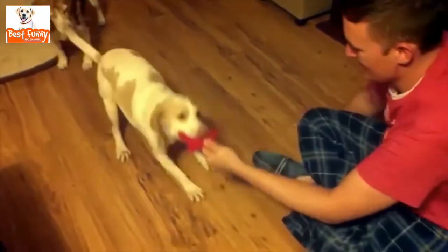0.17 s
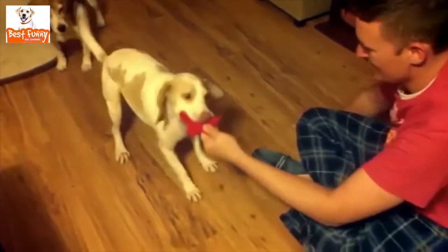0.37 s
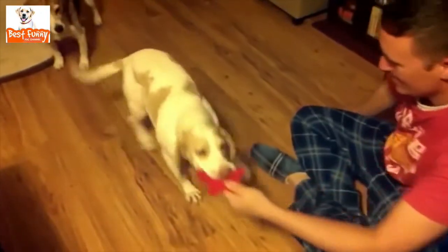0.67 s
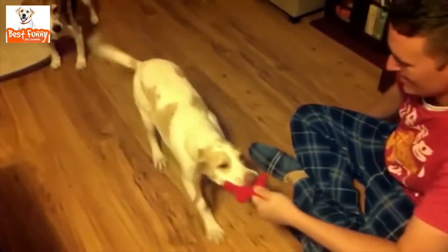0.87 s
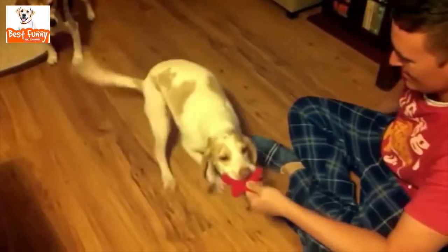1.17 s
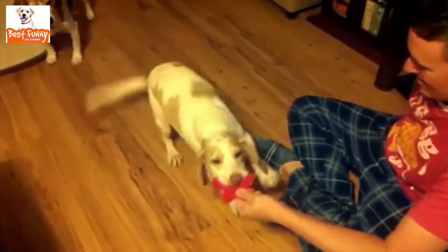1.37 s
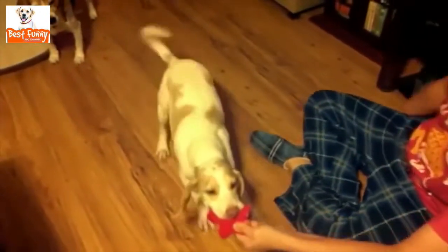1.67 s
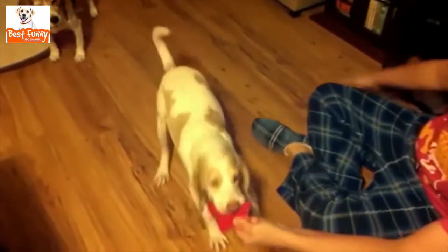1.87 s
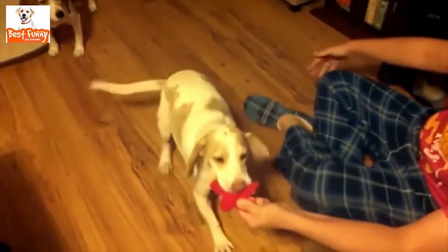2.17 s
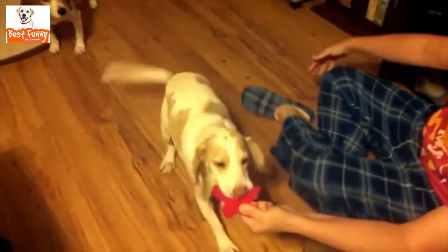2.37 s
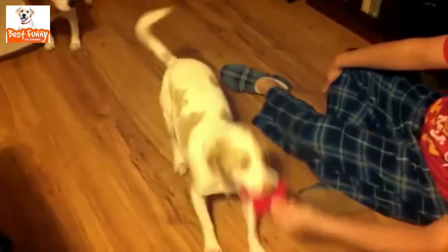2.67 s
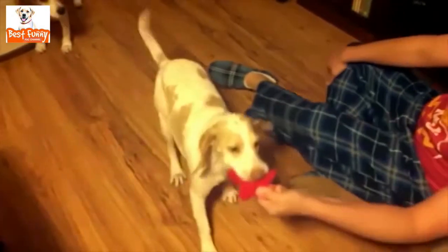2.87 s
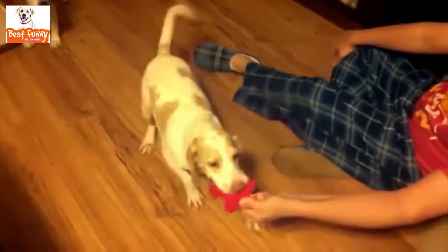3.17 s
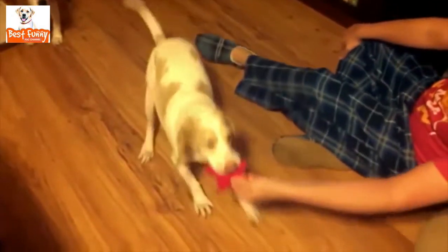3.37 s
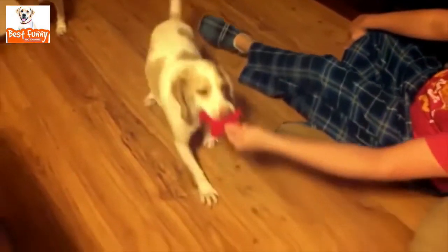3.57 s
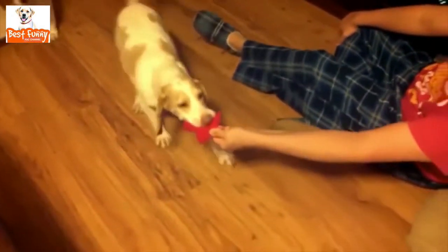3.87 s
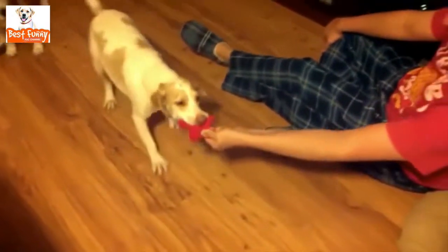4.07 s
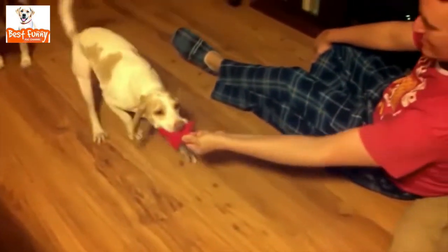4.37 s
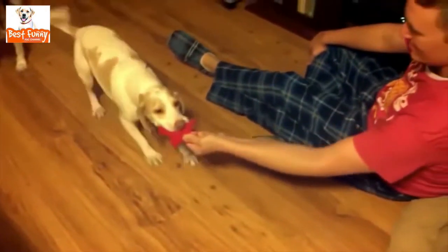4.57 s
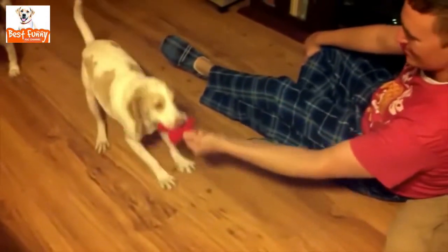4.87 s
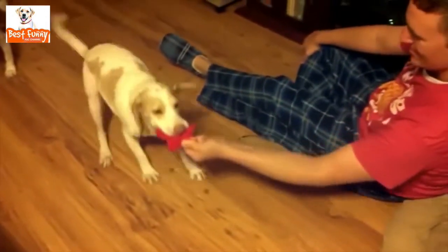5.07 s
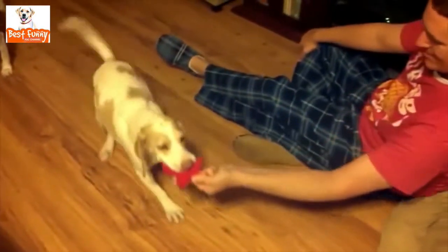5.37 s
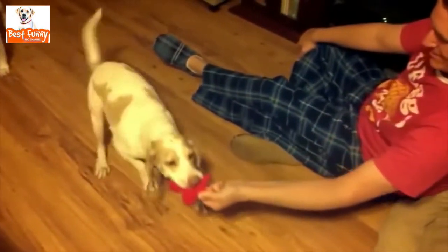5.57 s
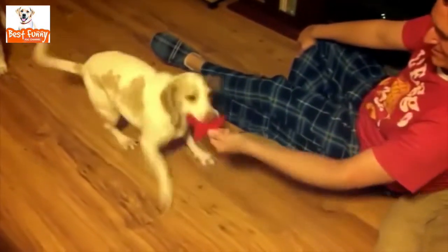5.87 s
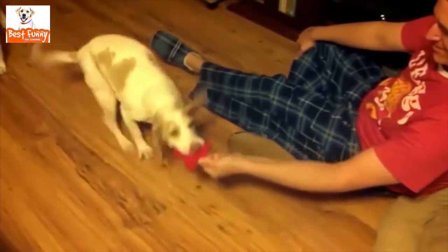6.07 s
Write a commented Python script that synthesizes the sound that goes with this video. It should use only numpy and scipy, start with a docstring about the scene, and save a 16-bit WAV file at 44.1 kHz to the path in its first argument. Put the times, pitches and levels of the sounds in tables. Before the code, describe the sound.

In a bare, slightly echoing living room, a dog's claws click and scrabble on wooden planks as it braces and pulls at a toy. The sharpest taps come early, then steps and brief skids follow more closely, with occasional soft pad thumps. Light fur and cloth rustle sits over a low hush. The microphone lacks the highest treble and has a few momentary dropouts.

```python
"""A bare, lively living room with a hardwood floor: a dog plays tug with a cloth toy.
Its claws tap and skid in stick-slip clicks that ring plank and claw and echo off the walls.
Its pads thud softly on the joists; fur and cloth rustle over the room's hush.
The microphone passes nothing above 7 kHz, and the sound cuts out briefly a few times."""
import sys
import numpy as np
from scipy import signal
from scipy.fft import rfft, irfft
from scipy.io import wavfile

SR = 44100
rng = np.random.default_rng(int(sys.argv[2]) if len(sys.argv) > 2 else 0)


def pcm_store(signal):
    """Save signal as 16-bit PCM."""
    levels = np.round(np.clip(np.atleast_2d(signal), -1, 1) * 32767)
    wavfile.write(sys.argv[1], SR, levels.astype(np.int16).T)


N = 274136
TIME = np.arange(N) / SR

# paw landings: (time [s], level [dB], plank pitch [Hz], board knock [dB], mid clack [dB],
# room send [dB], drag level [dB])
STEPS = [(0.1589, -29.5, 830, 5, 2, -13, -77), (0.7885, -22.5, 1012, 0.5, 2.5, 2.5, -41),
         (1.295, -43.5, 910, 20.5, -5, 0.5, -64.5), (1.308, -37.5, 893, -1.5, -0.5, -4.5, -59),
         (1.493, -40.5, 1120, -1, -6, 2, -72), (1.5201, -21.5, 1123, 0.5, 2, 1.5, -43.5),
         (2.2215, -37.5, 1017, 9, -7, -3.5, -60.5), (2.4506, -27, 913, -1.5, 1, 4, -44.5),
         (2.872, -40, 1193, 1.5, 5.5, 8.5, -48.5), (3.0995, -28.5, 1025, 4.5, 0.5, 2, -44),
         (3.287, -43.5, 1040, -12, 12, 0, -70), (3.5623, -29.5, 1040, 0, 3, 3, -51.5),
         (3.762, -37.5, 970, 5.5, 4.5, 6.5, -47.5), (4.053, -35.5, 990, -3, 3, 5.5, -49),
         (4.358, -30, 1000, 2.5, 1, -11, -49.5), (4.6149, -26.5, 1065, -3.5, -5.5, 0.5, -52),
         (4.7338, -32.5, 1057, 0, 1.5, 5, -45.5), (5.0707, -32, 1010, 3.5, 3, 0, -57),
         (5.2549, -26, 1160, -1.5, -3.5, 2.5, -46.5), (5.3305, -33, 1130, 4.5, 7, 2, -53.5),
         (5.5562, -36.5, 995, -6, -3.5, 1.5, -64), (5.825, -31, 1110, 3, -6.5, 2, -52.5),
         (6.046, -33.5, 1064, 3.5, 4, 3.5, -56.5), (6.208, -35, 1080, 6, 3, -8, -54)]


def from_db(db):
    """Decibels to gain."""
    return 10 ** (np.asarray(db) / 20)


def unit_rms(x):
    """Scale to rms 1."""
    return x / np.sqrt(np.mean(x ** 2) + 1e-20)


def at_hz(points, hz):
    """Read a table on a log-frequency axis."""
    known_hz, values = np.transpose(points)
    return np.interp(np.log(hz + 1e-6), np.log(known_hz), values)


def add(track, time_s, sound):
    """Mix a sound into a track."""
    start = min(max(round(time_s * SR), 0), N)
    track[start:start + len(sound)] += sound[:N - start]


def coloured(noise, spectrum):
    """Shape a noise by a spectrum; rms 1."""
    gain = from_db(at_hz(spectrum, np.fft.rfftfreq(N, 1 / SR)))
    return unit_rms(irfft(rfft(noise) * gain, N))


def resonate(force, modes, extra_db):
    """Parallel resonances of alternating sign, driven by one force."""
    out = 0
    for k, (hz, width_hz, db) in enumerate(modes):
        r = np.exp(-np.pi * width_hz / SR)
        feedback = [1, -2 * r * np.cos(2 * np.pi * hz / SR), r * r]
        ringing = signal.lfilter([1 - r * r, 0, r * r - 1], feedback, force)
        out = out + (-1) ** k * from_db(db + extra_db[k]) * ringing
    return out


def with_level(sound, db, length_s):
    """Scale to the energy of a level held for length_s."""
    return sound * from_db(db) * np.sqrt(length_s * SR / (np.sum(sound ** 2) + 1e-20))


def clicks(size, per_s, spread_db):
    """Impulses of random time, strength and sign."""
    chance, strength, sign = rng.random((3, size))
    return (chance < per_s / SR) * from_db(spread_db * strength) * np.sign(sign - .5)


def hush():
    """Steady low noise of the room."""
    # (frequency [Hz], relative density [dB])
    spectrum = [(25, -40.5), (55, -36.5), (85, -20), (130, -8.5), (240, -0.5), (300, -2), (400, -7),
                (650, -8), (1000, -9.5), (1500, -13.5), (2800, -18), (6500, -29), (9000, -48.5)]
    return from_db(-59) * coloured(rng.standard_normal(N), spectrum)


def rustle():
    """Fur, toy and trousers rub: fine, dense grains with small random swells."""
    # (time [s], level [dB])
    envelope = [(0, -60), (.55, -67.5), (.7, -50.5), (1.1, -50.5), (1.45, -56.5), (2.2, -55.5), (3.1, -53),
                (4.0, -57.5), (4.25, -49.5), (5.0, -52), (5.2, -48.5), (5.65, -47), (6.22, -47)]
    # (frequency [Hz], relative density [dB])
    spectrum = [(200, -28), (500, -26.5), (750, -3.5), (1050, -1), (2300, -7.5), (4000, -1.5), (6500, 1.5),
                (9000, -7)]
    level_db = np.interp(TIME, *np.transpose(envelope))
    knots_s = np.linspace(0, TIME[-1], 200)
    swell_db = 2.7 * np.interp(TIME, knots_s, rng.standard_normal(len(knots_s)))
    return from_db(level_db + swell_db) * coloured(clicks(N, per_s=5000, spread_db=9), spectrum)


def pads():
    """Soft, low thuds of pads on the joists; some are duller, some reach higher."""
    # (time [s], level [dB], contact [s], top [Hz])
    thuds = [(2.222, -52.5, 0.023, 700), (2.694, -61, 0.1, 300), (2.755, -58, 0.039, 300),
             (2.832, -48.5, 0.0061, 300), (3.1, -52, .015, 714), (4.35, -54, 0.077, 700)]
    # (frequency [Hz], width [Hz], gain [dB])
    joist_modes = [(122, 56, 4), (238, 89, 6.5), (490, 370, 4.5)]
    out, t = np.zeros(N), TIME[:SR // 5]
    for time_s, db, length_s, top_hz in thuds:
        softness = signal.butter(2, [top_hz / 4, top_hz], "band", fs=SR, output="sos")
        force = signal.sosfilt(softness, rng.standard_normal(len(t)) * np.exp(-(t / length_s) ** 2))
        thud = resonate(force, joist_modes, np.zeros(len(joist_modes)))
        add(out, time_s, with_level(thud, db, length_s))
    return out


def room(x, onset_s=0.0014, early_db=0.5, early_decay_s=0.022):
    """Reflections from floor and furniture melt into a diffuse tail that dies band by band."""
    # (frequency [Hz], T60 [s])
    decay_times = [(200, 0.88), (1000, 0.52), (2500, 0.8), (6500, 0.37)]
    t, hz = TIME[:SR], np.fft.rfftfreq(SR, 1 / SR)
    white, centres_hz = rfft(rng.standard_normal(SR)), np.geomspace(125, 8000, 7)
    tail = 0
    for centre_hz, share in zip(centres_hz, np.eye(len(centres_hz))):
        band = irfft(white * np.interp(hz, centres_hz, share), SR)
        tail = tail + band * np.exp(-np.log(1000) * t / at_hz(decay_times, centre_hz))
    reflections = unit_rms(clicks(SR, per_s=580, spread_db=9.5))
    early = from_db(early_db) * reflections * np.exp(-t / early_decay_s)
    response = (tail + early) * np.clip(t / onset_s - 1, 0, 1)
    return signal.fftconvolve(x, response / np.sqrt(np.sum(response ** 2)))[:N]


def wall_echoes(count):
    """Each wall returns its own share of the claw chatter by its own path."""
    walls = [room(claws(to_room=True, variety_db=1.7)) for _ in range(count)]
    return sum(walls) / np.sqrt(count)


def skid_force(length_s):
    """A claw bites quickly, sticks and slips over the grain, and lets go."""
    t = TIME[:SR // 6]
    bite = 1 - np.exp(-t / .003)
    return bite * np.exp(-(t / length_s) ** 4) * clicks(len(t), per_s=4000, spread_db=16.5)


def tap_force(length_s):
    """A claw lands, chatters for a few milliseconds and settles."""
    t = TIME[:SR // 20]
    impact = np.exp(-(t / length_s) ** 2)
    settling = from_db(-10) * np.exp(-t / .007)
    return (impact + settling) * clicks(len(t), per_s=9000, spread_db=6.5)


def landing(time_s, db, count=3, gap_s=.0178, loss_db=11):
    """One paw's claws tap in turn, each weaker; hard landings have shorter contact."""
    ordinary_db, ordinary_s, halving_db = -32.5, 0.0048, 18
    length_s = ordinary_s * 2 ** ((ordinary_db - max(db, ordinary_db)) / halving_db)
    return [(time_s + k * gap_s, db - k * loss_db, length_s) for k in range(count)]


def contacts():
    """Every claw touch: a landing paw taps, then drags as it takes weight; a braced paw skids."""
    # (time [s], level [dB], length [s], board knock [dB], room send [dB])
    skids = [(0.163, -28.5, 0.012, 1.5, -23.5), (0.536, -62, 0.025, 0, -7), (0.627, -54, 0.074, 4, 1),
             (1.658, -57.5, 0.13, 3.5, 7.5), (1.84, -52.5, 0.099, 0, 2.5), (2.207, -43.5, 0.15, 1.5, -6),
             (2.373, -49.5, 0.027, 3, 5.5), (2.545, -56, 0.13, 6, 6), (3.051, -51.5, 0.076, 3.5, -5.5),
             (3.436, -45, 0.04, -5.5, -11), (3.498, -44, .07, -1, -2.5), (4.277, -42, 0.11, -6, 3),
             (4.507, -51, 0.034, -1, -11), (5.03, -46, 0.053, -2.5, -2), (5.462, -57.5, 0.18, -2, 4.5),
             (5.751, -37, 0.062, -4, 0.5), (5.994, -43.5, 0.035, 1.5, 5.5), (6.121, -55.5, 0.17, -1, 10)]
    drag_delay_s, drag_s, drag_room_db = .014, 0.079, 0.5
    skid_clack_db = 2.5
    for time_s, db, _, knock_db, clack_db, room_db, drag_db in STEPS:
        for tap_s, tap_db, length_s in landing(time_s, db):
            yield tap_s, tap_force, tap_db, length_s, knock_db, clack_db, room_db
        yield time_s + drag_delay_s, skid_force, drag_db, drag_s, knock_db, clack_db, drag_room_db
    for time_s, db, length_s, knock_db, room_db in skids:
        yield time_s, skid_force, db, length_s, knock_db, skid_clack_db, room_db


def contact_modes(time_s):
    """Resonances under a touch: soft paw, plank of the step nearest in time, and claw."""
    # faint paw thud: (frequency [Hz], width [Hz], gain [dB])
    pad_mode = (295, 570, -19)
    # plank bending: (frequency [x pitch], width [Hz], gain [dB])
    plank_modes = [(1, 170.2, -1), (1.551, 196.4, -6.5), (1.918, 194, -5.5)]
    # claw on varnish: (frequency [Hz], width [Hz], gain [dB])
    claw_modes = [(2470, 710, -7), (3790, 550, 1.5), (4160, 780, 2.5), (5240, 1050, 3.5), (5825, 380, 6),
                  (6400, 587, 4.5)]
    pitch_hz = min(STEPS, key=lambda step: abs(step[0] - time_s))[2]
    plank = [(ratio * pitch_hz, width_hz, db) for ratio, width_hz, db in plank_modes]
    detune = 1 + 0.038 * rng.standard_normal()  # claws differ in size
    claw = [(hz * detune, width_hz, db) for hz, width_hz, db in claw_modes]
    return np.array([pad_mode] + plank + claw)


def claws(to_room, variety_db):
    """Taps and skids as they leave the floor, toward a wall (to_room) or the microphone."""
    # register centres: (board knock [Hz], mid clack [Hz], claw tick [Hz])
    registers_hz = [1470, 3040, 6200]
    out = np.zeros(N)
    for time_s, force_of, db, length_s, knock_db, clack_db, room_db in contacts():
        modes = contact_modes(time_s)
        weight_db = np.interp(modes[:, 0], registers_hz, [knock_db, clack_db, 0])
        spot_db = variety_db * rng.standard_normal(len(modes))  # each spot favours other modes
        ringing = resonate(force_of(length_s), modes, weight_db + spot_db)
        add(out, time_s, with_level(ringing, db + room_db * to_room, length_s))
    return out


def scene():
    """Hush, claws and their echoes, pads and rustle; mono."""
    mix = hush() + claws(to_room=False, variety_db=2.0) + wall_echoes(count=2) + pads() + rustle()
    return mix[None]


def record(dry):
    """Brief dropouts that sink steadily and snap back, then the microphone's steep low-pass."""
    # (start [s], end [s], depth [dB])
    dropouts = [(-.1, 0.136, -48), (2.269, 2.376, -49), (2.412, 2.435, -23.5), (2.52, 2.546, -15.5),
                (3.388, 3.415, -13.5), (3.483, 3.497, -15), (4.429, 4.515, -30.5)]
    sink_db_per_s, return_s = 1300, 0.0014
    cutoff_hz = 6900
    dip_db = 0
    for start_s, end_s, depth_db in dropouts:
        sinking_db = np.clip(sink_db_per_s * (start_s - TIME), depth_db, 0)
        dip_db = dip_db + sinking_db * np.clip((end_s - TIME) / return_s, 0, 1)
    low_pass = signal.ellip(9, .3, 50, cutoff_hz, fs=SR, output="sos")
    return signal.sosfilt(low_pass, dry * from_db(dip_db))


dry = scene()
out = record(dry)
pcm_store(out)
```